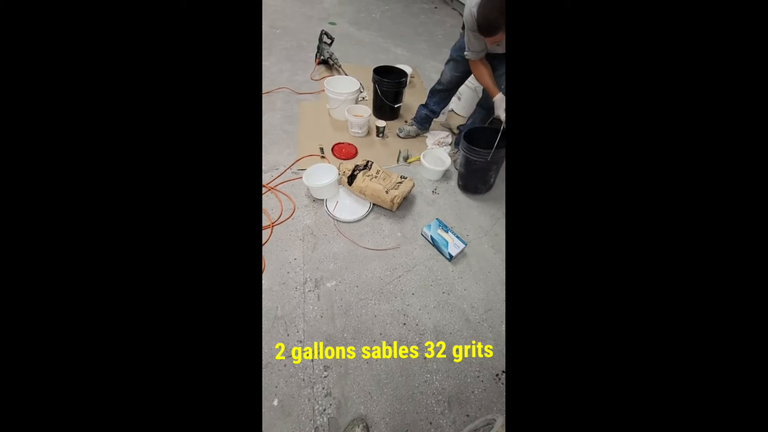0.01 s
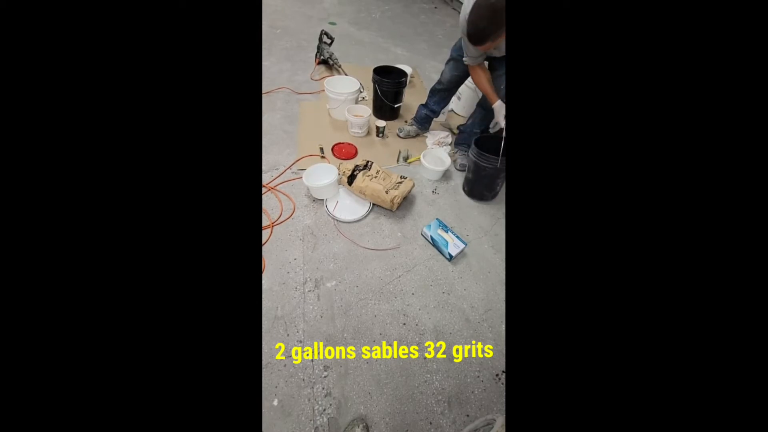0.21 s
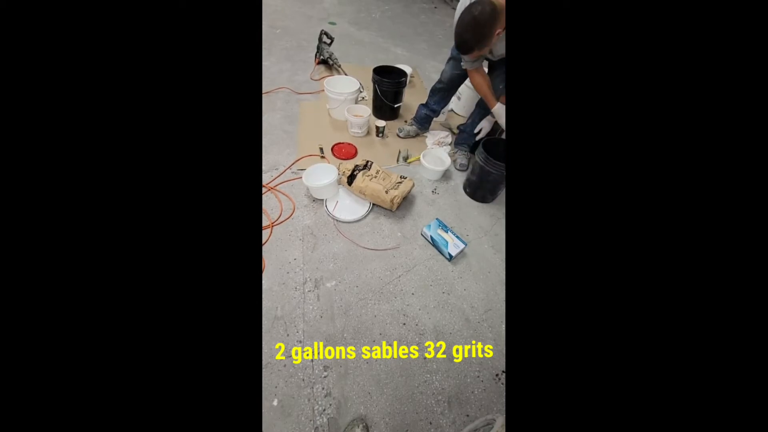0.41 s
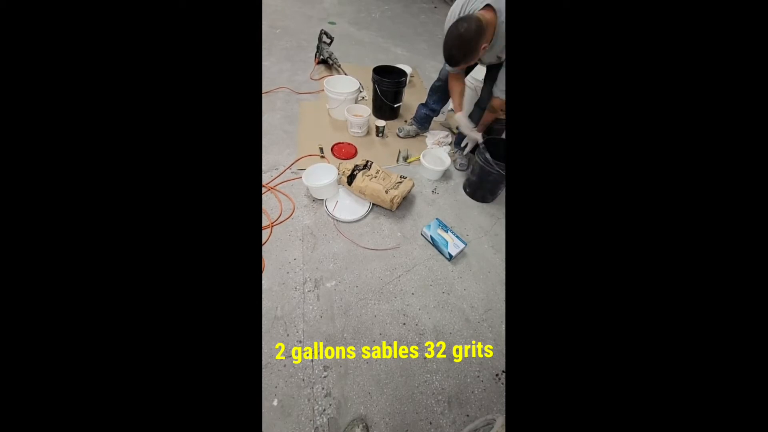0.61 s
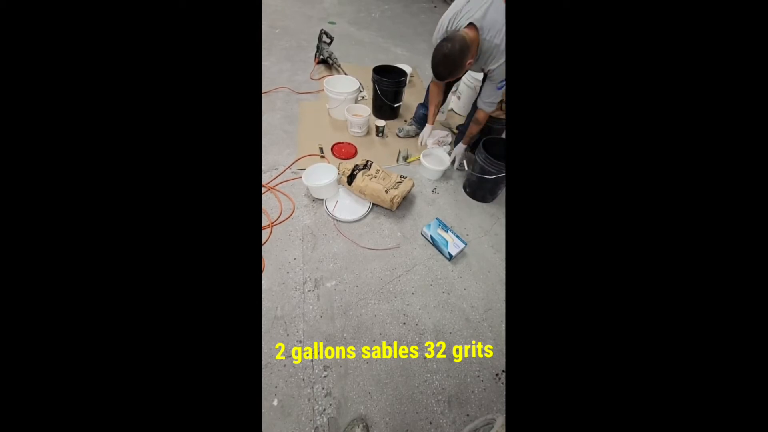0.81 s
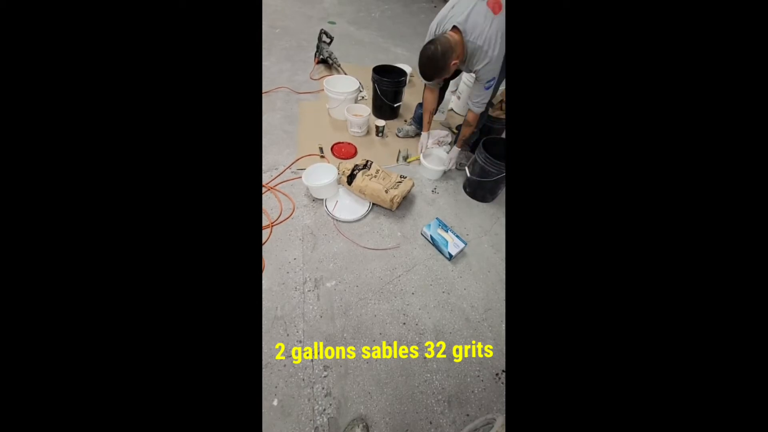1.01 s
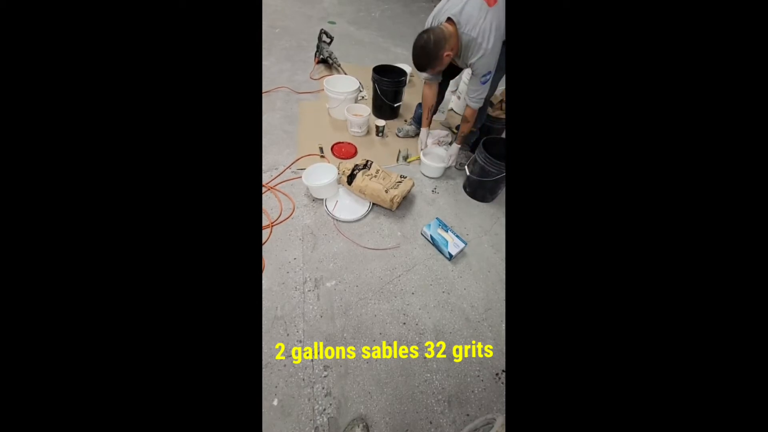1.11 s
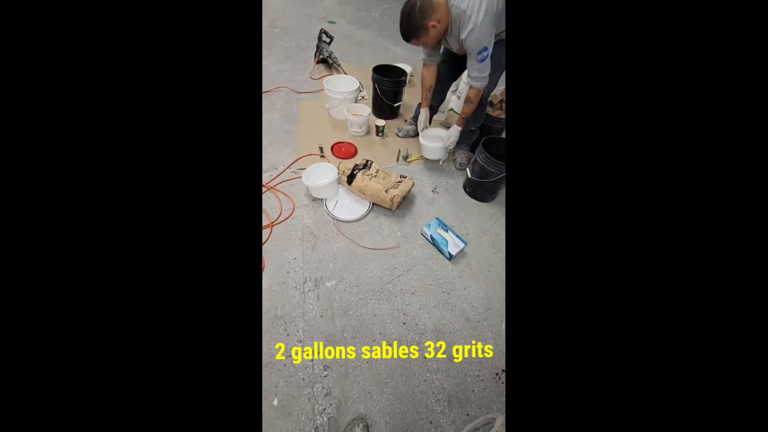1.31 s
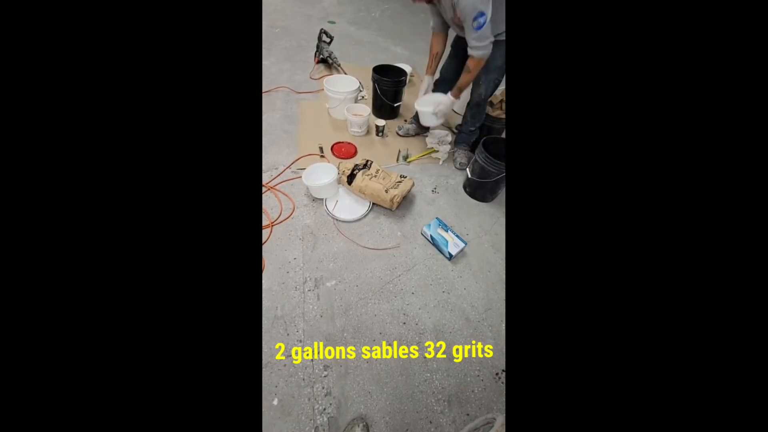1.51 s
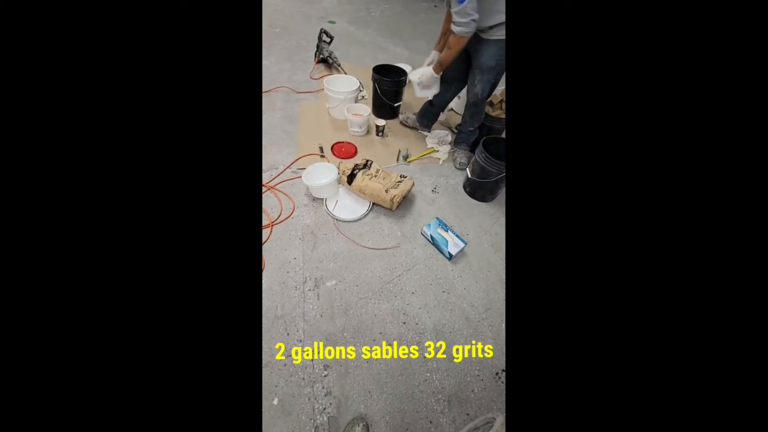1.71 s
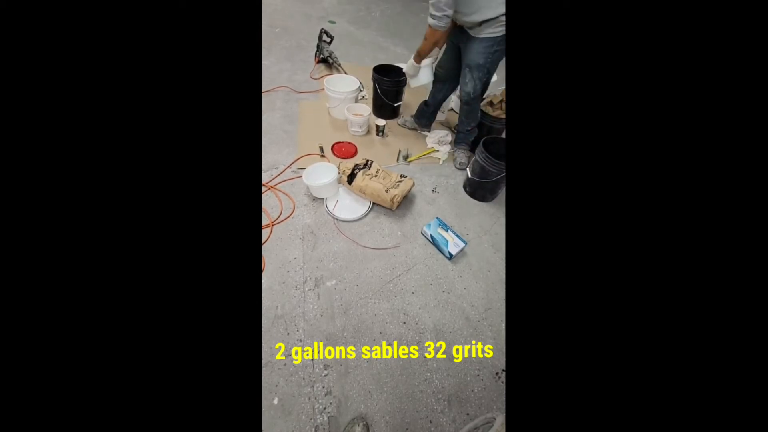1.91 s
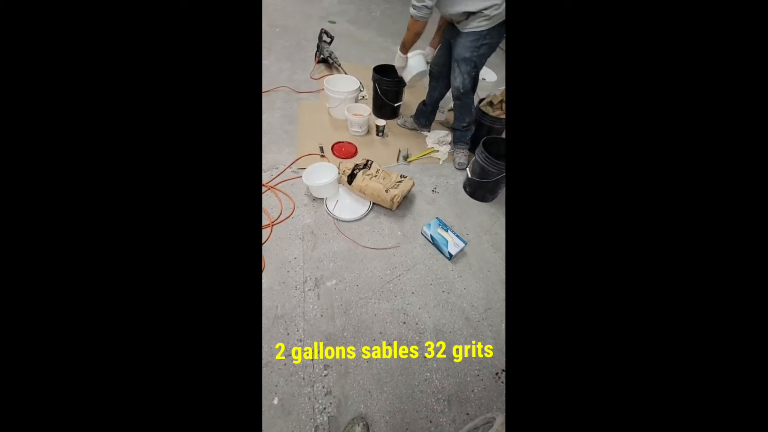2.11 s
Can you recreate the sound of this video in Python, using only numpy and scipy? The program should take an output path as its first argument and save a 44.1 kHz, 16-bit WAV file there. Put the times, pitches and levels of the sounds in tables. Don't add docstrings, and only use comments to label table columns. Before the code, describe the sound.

Hollow plastic bucket set down hard on concrete, followed by ringing pail-handle knocks and a brief scrape

```python
import sys
import numpy as np
from scipy import signal
from scipy.fft import rfft, irfft
from scipy.io import wavfile
from scipy.ndimage import uniform_filter1d

SR = 44100
rng = np.random.default_rng(int(sys.argv[2]) if len(sys.argv) > 2 else 0)


def volts(x):
    e = np.asarray(x, float) / 20
    return 10 ** e


def unload_wav(signal):
    wavfile.write(
        sys.argv[1],
        SR,
        np.round(np.clip(np.atleast_2d(signal).T, -1, 1) * 32767).astype(np.int16),
    )


N = 97020
BLOW_T = np.arange(4410) / SR


def evened(x):
    return x / np.sqrt(np.mean(x ** 2) + 1e-20)


def read(points, hz):
    f, value = np.transpose(points)
    return np.interp(np.log(hz + 1), np.log(f + 1), value)


def coloured(x, points):
    hz = np.fft.rfftfreq(x.shape[-1], 1 / SR)
    return irfft(rfft(x) * volts(read(points, hz)), x.shape[-1])


def ridden(points):
    s, db = np.transpose(points)
    return volts(np.interp(np.arange(N) / SR, s, db, -120, -120))


def modes(table, t):
    out = 0
    for hz, db, t60 in table:
        detuned = hz * (1 + 0.015 * rng.standard_normal())
        out = out + volts(db - 60 * t / t60) * np.sin(2 * np.pi * detuned * t)
    return out


def puff(points, t, t60, rise=0.00044):
    noise = evened(coloured(rng.standard_normal(len(t)), points))
    return noise * volts(-60 * t / t60) * np.minimum(t / rise, 1)


# start_s, level_db, pitch_hz, contact_s, slap_db
THUDS = [(0.2136, -3, 229.6, 0.023, -19.5), (0.246, -16.5, 240, .012, -31.5),
         (.272, -10.5, 224.6, 0.016, -21.5), (0.295, -11.5, 241.3, 0.017, -21.5),
         (.322, -11.5, 277, 0.01, -23), (0.341, -11.5, 229.7, 0.0052, -27.5),
         (0.379, -12, 225.7, 0.0082, -21), (.403, -19, 255, 0.0085, -36),
         (0.459, -17.5, 288.5, 0.008, -18.5), (.469, -9, 220.2, .012, -22), (.579, -21, 216, 0.0091, -30)]
# freq_hz, level_db
SLAP = [(300, -2), (500, -1.5), (900, -2), (1200, -2.5), (2100, -22), (3600, -40), (6500, -39),
        (15000, -55)]
# freq_hz, level_db, t60_s
BUCKET_MODES = [(183, 1, 0.018), (297, -8.5, 0.045), (348.5, -8.5, 0.075), (410, -24, 0.04)]


def thud(db, hz, contact, slap_db):
    t, slap_rise_s, slap_t60_s, floor_t60_s = BLOW_T, 0.0015, 0.34, 0.02
    swell = np.minimum(t / contact, 1) ** 0.8
    damped = volts(-60 * np.maximum(t - contact, 0) / floor_t60_s)
    shape = uniform_filter1d(swell * damped, size=130) * np.minimum(t / slap_rise_s, 1)
    floor = shape * np.sin(2 * np.pi * hz * t)
    sides = modes(BUCKET_MODES, t) * np.minimum(2 * t / contact, 1)
    slap = volts(slap_db) * puff(SLAP, t, slap_t60_s, slap_rise_s)
    return volts(db) * (floor + sides + slap)


# centre_s, level_db
BUMPS = [
    (0.235, -55.5),
    (0.386, -31.5),
    (0.464, -27.5),
]
BUMP_CENTRE_S = 0.05


def bump(db):
    t, width_s = BLOW_T - BUMP_CENTRE_S, 0.0073
    return volts(db) * np.exp(-(t / width_s) ** 2) * np.sin(2 * np.pi * 100 * t)


# start_s, level_db, ring_db, body_db, snap_db
KNOCKS = [
    (.344, -53, -13, -33, -4),
    (.3700, -48, -9.5, -34, 5),
    (.41, -47, -2, -18.5, -3.5),
    (.4612, -42, 0, -2, 9),
    (.4725, -30, 3.5, 6, 4.5),
    (.7905, -14.5, 6, 1, 1),
    (1.077, -24, 5, 4.5, 6.5),
    (1.2452, -33.5, -0.5, -1, 5),
    (1.330, -41.5, -8.5, 2.5, 3.5),
    (1.582, -62.5, 9, -17, -11.5),
]
# freq_hz, level_db, t60_s
RING = [(2911, 5, 0.021), (2645, -10.5, 0.024), (3150, -5.5, 0.0076), (2255, -12, 0.014),
        (2830, 1.5, 0.018), (3150, -12.5, 0.014)]
# freq_hz, level_db, t60_s
BODY = [(185, -8.5, 0.15), (320, 3, 0.022), (777, -4, 0.049), (1016, -12, 0.15), (1162, -9, 0.14),
        (1286, 0, 0.05), (1538, -14.5, .04), (1760, -23.5, 0.004)]
# freq_hz, level_db
SNAP = [(200, -33.5), (400, -6.5), (1400, -1.5), (3100, -9), (6200, -13.5), (11300, -18), (12800, -12),
        (14300, -17), (15800, -41.5)]


def knock(db, ring_db, body_db, snap_db):
    t = BLOW_T
    snap = volts(db + snap_db) * puff(SNAP, t, 0.015, 0.0014)
    ring = volts(db + ring_db - 3.5) * modes(RING, t) * np.minimum(t / 0.0015, 1)
    low_cut = signal.butter(3, 166, "high", fs=SR, output="sos")
    body = signal.sosfilt(low_cut, volts(db + body_db - 14) * modes(BODY, t))
    click = coloured(1. * (np.arange(4410) == 200), SNAP)
    click = click / np.linalg.norm(click) * np.linalg.norm(snap) * volts(4.5)
    rattle = volts(db + snap_db - 13) * puff(SNAP, t, 0.48)
    straight = volts(4) * snap + rattle + body + volts(-8) * ring
    walls = volts(-8) * snap + body + ring * np.minimum(t / 0.0021, 1)
    hardness_db = 0.45 * (db + 13)
    ring_t60_s = 0.022 * volts(hardness_db)
    wet = click + body + ring * volts(6 - hardness_db / 2 - 60 * t / ring_t60_s)
    return straight, walls, wet


# time_s, level_db
DRAG = [
    (1.214, -72.5),
    (1.233, -33),
    (1.258, -25.5),
    (1.276, -41),
    (1.31, -52),
    (1.336, -34.5),
    (1.38, -43.5),
    (1.45, -46),
    (1.6, -66),
]
# freq_hz, level_db
DRAG_TONE = [(500, -14.5), (900, -5), (1170, -3.5), (1450, -1.5), (1750, -18), (2750, -10.5), (3300, -23.5),
             (6000, -59.5)]


def drag():
    strength = rng.standard_normal(N) * volts(2.5 * rng.exponential(1, N))
    slips = strength * (rng.random(N) < 900 / SR)
    return evened(coloured(slips, DRAG_TONE)) * ridden(DRAG)


# freq_hz, level_db, t60_s
STEP = [(240, 1.5, 0.061), (397, -2, 0.068), (509, -1.5, 0.067), (640, -13.5, 0.049), (1110, -35, 0.026)]
# freq_hz, level_db
STEP_SCUFF = [(150, -10), (300, -1.5), (700, 0), (1250, -8), (1600, -25), (4000, -50), (15000, -70)]


def step():
    t = np.arange(13230) / SR
    knocked = modes(STEP, t) * np.minimum(t / 0.0033, 1)
    return volts(-37.5) * (knocked + volts(-10) * puff(STEP_SCUFF, t, 0.093))


# time_s, level_db
GRIT = [(.36, -104), (0.374, -71), (0.462, -54.5), (0.501, -100.5), (1.57, -120), (1.587, -62),
        (1.65, -60.5), (1.722, -58.5), (1.8, -65), (1.9, -68.5), (1.94, -65.5), (2.2, -64.5)]
# freq_hz, level_db
GRIT_TONE = [(1500, -19), (2900, 6.5), (4500, 1.5), (8000, -4.5), (13000, -6), (16000, -8)]


def grit():
    hiss = rng.standard_normal((2, N))
    hits = volts(1.17 * rng.exponential(1, N)) * (rng.random(N) < 3000 / SR)
    grains = hiss * (0.58 + hits)
    return evened(coloured(grains, GRIT_TONE)) * ridden(GRIT)


def direct(s):
    out = np.zeros((2, 4410))
    out[:, round(s * SR)] = 1
    return out


def placed(s, sound, path):
    at = round(s * SR)
    heard = signal.fftconvolve(sound[None], path, axes=1)[:, :N - at]
    return np.pad(heard, ((0, 0), (at, N - at - heard.shape[1])))


# freq_hz, lead_rad
NEAR_LEAD = [(100, 4.5), (270, -9), (400, 3), (1500, 2.5), (2200, 1), (3000, 2), (9000, 2), (13000, 1.5)]
# freq_hz, lean_db
NEAR_LEAN = [(90, -3.5), (230, -9.5), (700, 9.5), (1500, 7), (2200, 2.5), (6000, -5), (9500, 4),
             (13000, -5)]


def ports(x):
    hz, side = np.fft.rfftfreq(N, 1 / SR), np.array([[.5], [-.5]])
    turn = np.exp(1j * side * read(NEAR_LEAD, hz))
    return irfft(rfft(x) * volts(side * read(NEAR_LEAN, hz)) * turn, N)


# delay_s, level_db, lean_db (left over right)
ECHOES = [(.0065, -15.5, 12), (.0105, -22.5, -5.5), (.0125, 8, 7.5), (.0145, 3.5, -8), (.019, -7, 18.5),
          (.0235, 10.5, -3), (.027, -2.5, 10.5), (.032, -7.5, -5.5), (.041, -6, -5.5)]


def echoes():
    taps = np.zeros((2, 4410))
    for k, (s, db, lean_db) in enumerate(ECHOES):
        gain = volts(db + lean_db / 2 * np.array([[1], [-1]]))
        taps = taps + (-1) ** k * gain * direct(s)
    dull = signal.sosfilt(signal.butter(4, 3600, fs=SR, output="sos"), taps)
    return taps * volts(-20) + dull


# freq_hz, likeness (0 to 1)
SAME = [(90, 0.58), (230, 1), (420, 0.34), (950, 0.319), (1500, 0.28), (2400, 0.19), (6000, 0.0345),
        (15000, 0.16)]
# freq_hz, lead_rad
LEAD = [(100, 0.15), (260, 0.14), (420, 0.448), (700, 2.74), (1200, 1.84), (15000, 8.8)]
# freq_hz, lean_db
LEAN = [(90, -1), (230, -4), (430, -2.5), (900, -1), (3000, -1), (6000, -2.5), (9500, 1.5), (13000, -1)]


def diffuse(size, db_of):
    frames, hz = N // (size // 4) + 5, np.fft.rfftfreq(size, 1 / SR)
    a, b, c, d = rng.standard_normal((frames, len(hz), 4)).T
    same = np.clip(read(SAME, hz), 0, 1)[:, None]
    lag = np.exp(-1j * read(LEAD, hz))[:, None]
    left = a + 1j * b
    right = same * left * lag + np.sqrt(1 - same ** 2) * (c + 1j * d)
    lean = volts(read(LEAN, hz) / 2)[:, None]
    level = volts(db_of(hz[:, None], np.arange(frames) * size / 4 / SR))
    z = np.array([left * lean, right / lean]) * level
    return signal.istft(z, nperseg=size, noverlap=3 * size // 4)[1][:, :N]


# freq_hz, t60_s
HALL = [(100, 2.12), (250, 1.235), (600, 1.08), (1000, 1.086), (1450, 1.09), (3000, 1.03), (6000, 0.78),
        (15000, 0.53)]
# freq_hz, level_db
HALL_TONE = [(100, -9.5), (300, 1.5), (1000, 0.5), (3000, -7), (5000, -10), (9000, -13), (15000, -22.5)]


def hall():
    t, gap_s, rise_s = np.arange(N) / SR, 0.0009, 0.014
    tail = diffuse(512, lambda hz, s: read(HALL_TONE, hz) - 60 * s / read(HALL, hz))
    tail = tail * np.clip((t - gap_s) / rise_s, 0, 1)
    return tail / np.linalg.norm(tail[:, :SR])


# freq_hz, level_db
FADING = [(200, 5.5), (600, -0.5), (2500, -16), (7000, -30), (13000, -32.5)]


def fading():
    tail = evened(diffuse(512, lambda hz, s: read(FADING, hz) + 0 * s))
    return tail * volts(-46 - 60 * np.arange(N) / SR)


# freq_hz, level_db
AIR = [(20, -34), (65, -4.5), (250, -22), (400, -13.5), (700, -20), (2500, -35.5), (8000, -51.5),
       (13000, -56.5), (16000, -34)]
# freq_hz, level_db
FAN = [(120, -60), (240, -57)]


def air():
    t = np.arange(N) / SR
    waver = 4.26 * np.sin(2 * np.pi * 1.9 * t)
    hum = sum(volts(db) * np.sin(2 * np.pi * hz * t + waver) for hz, db in FAN)
    rumble = evened(diffuse(2048, lambda hz, s: read(AIR, hz) + 0 * s))
    return volts(-52) * rumble + hum


def scene():
    far, near = air() + grit() + fading(), np.zeros((2, N))
    tails, early = [hall() for _ in range(4)], echoes()
    # start s, sound, hall send dB
    soft = [(s, thud(*row), -2.5) for s, *row in THUDS]
    soft += [(s - BUMP_CENTRE_S, bump(db), -2) for s, db in BUMPS]
    soft.append((1.9245, step(), -3))
    lean = volts(-4 * np.array([[.5], [-.5]]))
    for k, (s, sound, wet_db) in enumerate(soft):
        send = sound
        if k < len(THUDS):
            send = sound * volts(-60 * BLOW_T / 0.06)
        far = far + placed(s, sound, direct(0) * lean)
        far = far + placed(s + 0.018, send, volts(wet_db) * tails[k % 4])
    for k, (s, *row) in enumerate(KNOCKS):
        straight, walls, wet = knock(*row)
        near = near + placed(s, straight, direct(0)) + placed(s, walls, early)
        far = far + placed(s, wet, volts(7) * tails[(k + 1) % 4])
    rim = drag()
    return ports(near + rim) + far + placed(0, rim, volts(-6) * tails[0])


def limited(x):
    knee, ceiling = 0.8, 0.93
    room = ceiling - knee
    bent = np.sign(x) * (knee + room * np.tanh((abs(x) - knee) / room))
    return np.where(abs(x) > knee, bent, x)


# freq_hz, level_db
BASS_SIDE = [(60, -10), (130, -10), (250, 1)]


def roll_off(x):
    return signal.sosfilt(signal.butter(12, 16650, fs=SR, output="sos"), x)


def record(dry):
    mid, side = dry.mean(0), coloured((dry[0] - dry[1]) / 2, BASS_SIDE)
    low_cut = signal.butter(2, 51, "high", fs=SR, output="sos")
    mix = limited(signal.sosfilt(low_cut, [mid + side, mid - side]))
    return roll_off(mix)


dry = scene()
out = record(dry)
unload_wav(out)
```